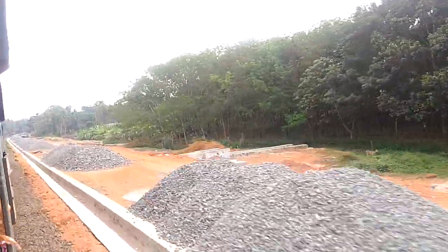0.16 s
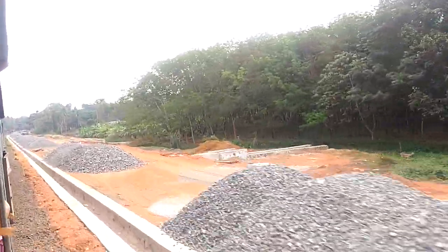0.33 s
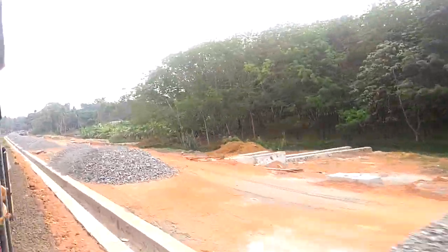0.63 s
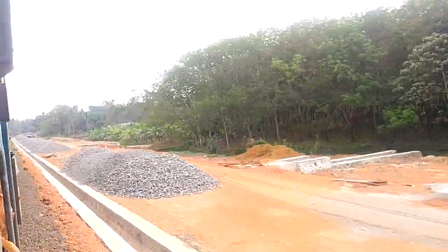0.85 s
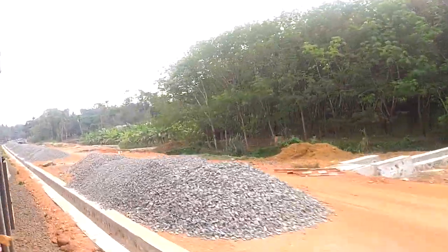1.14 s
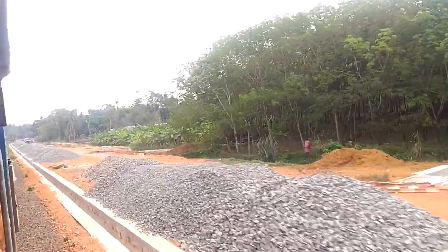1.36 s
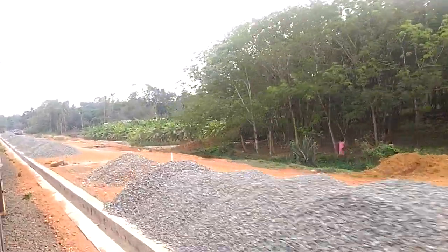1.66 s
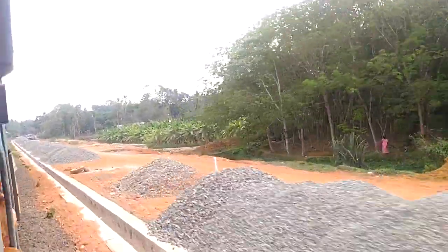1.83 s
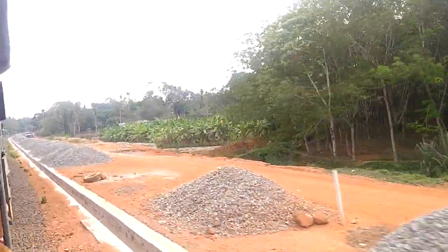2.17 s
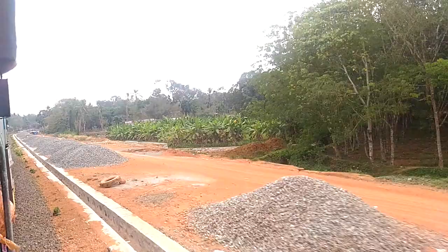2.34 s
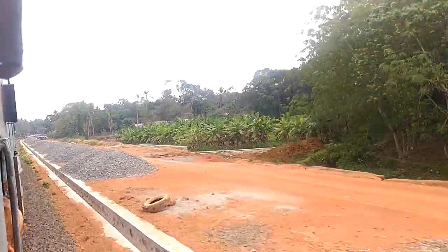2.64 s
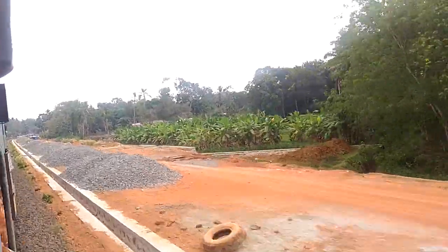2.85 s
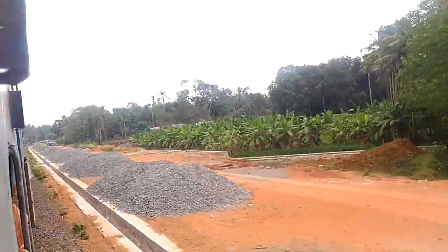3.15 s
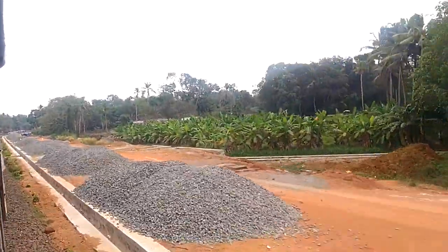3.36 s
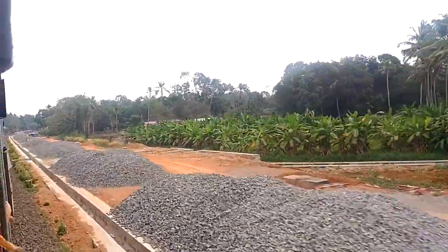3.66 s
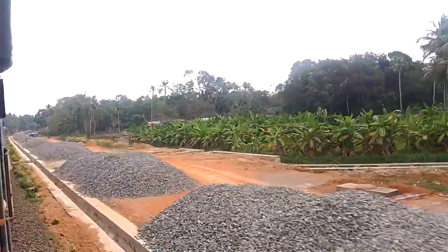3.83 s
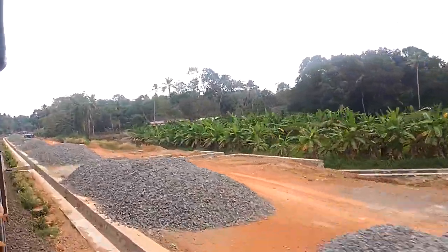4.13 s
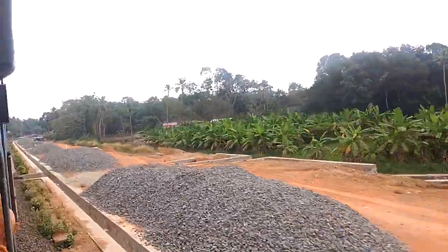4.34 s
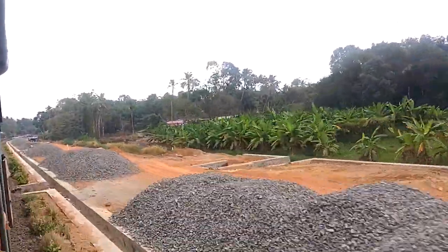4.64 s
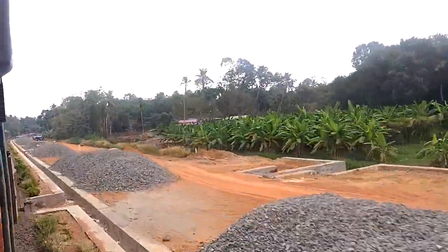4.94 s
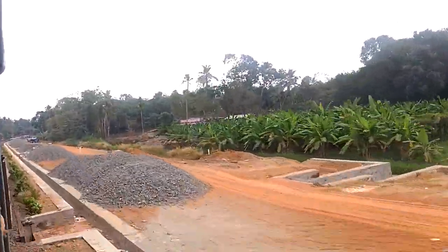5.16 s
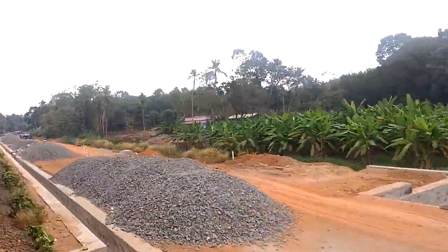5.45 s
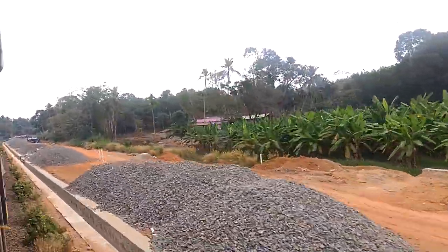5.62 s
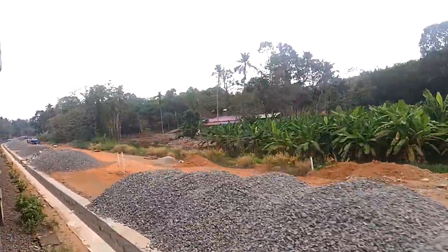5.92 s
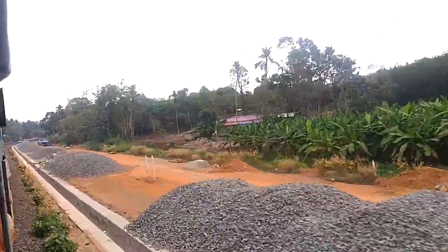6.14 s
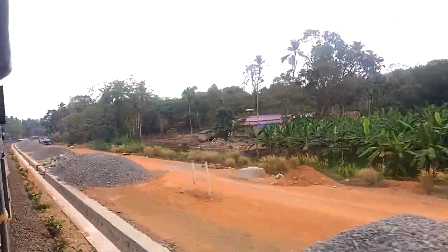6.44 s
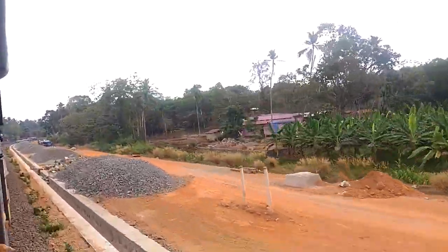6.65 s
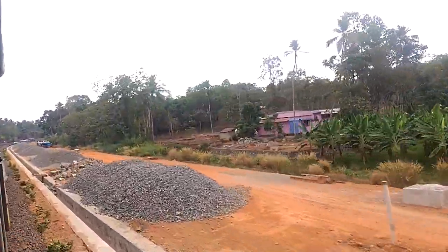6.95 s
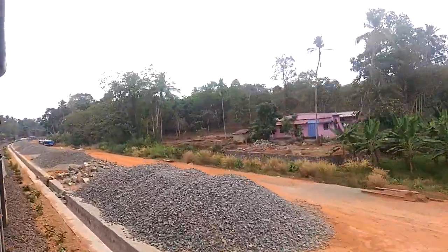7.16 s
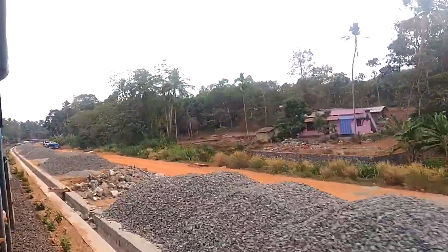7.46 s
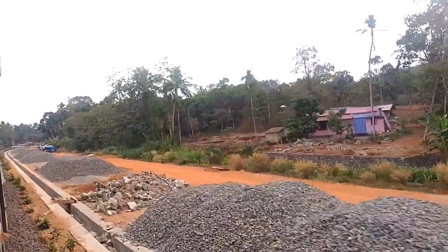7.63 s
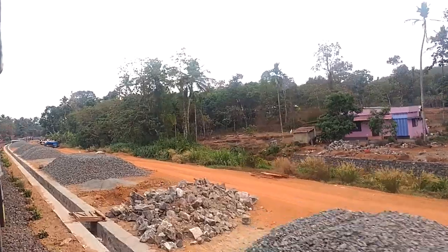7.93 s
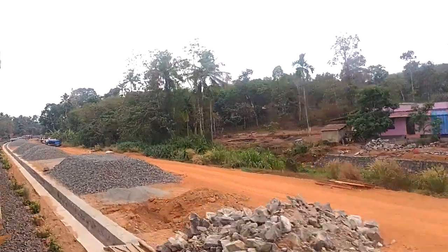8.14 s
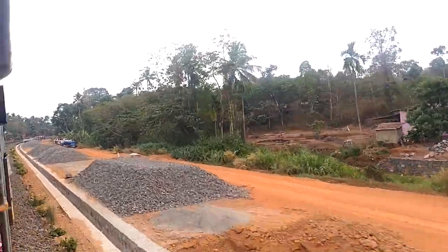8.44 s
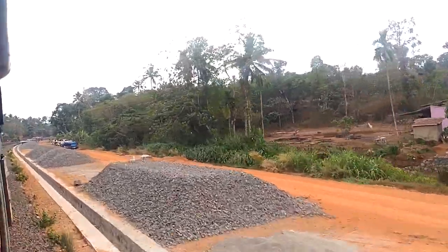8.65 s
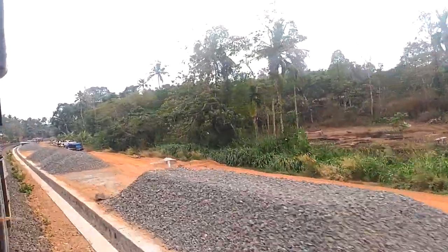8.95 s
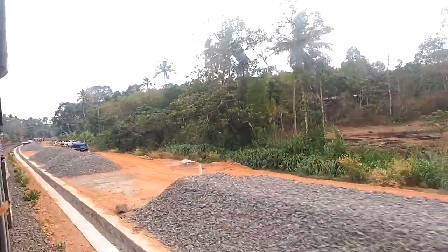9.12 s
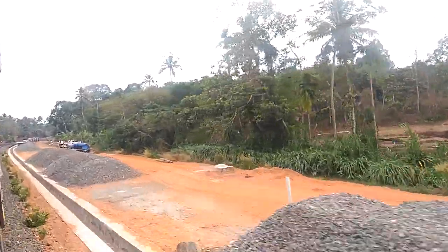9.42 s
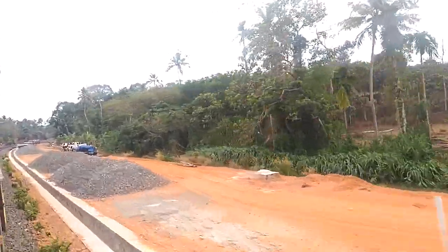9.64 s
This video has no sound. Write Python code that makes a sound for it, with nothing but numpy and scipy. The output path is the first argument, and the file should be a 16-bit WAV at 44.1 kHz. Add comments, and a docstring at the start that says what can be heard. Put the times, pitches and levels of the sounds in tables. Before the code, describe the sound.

Wind buffets a microphone at a moving train's open window, wheels clack over joints, then a distant horn gives one long blast and one short.

```python
"""Train horn from an open coach window

Far ahead the locomotive sounds a single-note air horn, one long blast and a short one, built from
harmonics with echoes that make it flutter. Wheels clack over the rail joints as short bursts of noise, and
axles knock the floor as dying tones. Filtered noise makes the slipstream that buffets the microphone, the
hissing rush of air and rails, and the rolling rumble of the moving coach.
"""
import sys
import numpy as np
from scipy import signal
from scipy.fft import rfft, irfft, next_fast_len
from scipy.io import wavfile
from scipy.ndimage import uniform_filter1d

SR = 44100
rng = np.random.default_rng(int(sys.argv[2]) if len(sys.argv) > 2 else 0)


def unload_wav(signal):
    """Save mono or channel-first audio to the path in sys.argv[1] as 16-bit WAV at rate SR, clipped to [-1, 1]."""
    wavfile.write(
        sys.argv[1],
        SR,
        np.round(np.clip(np.atleast_2d(signal).T, -1, 1) * 32767).astype(np.int16),
    )


N = 431738
T = np.arange(N) / SR  # time in seconds
CUTOFF_HZ = 14330  # top of the sound

# The horn's blasts. Each row: valve opens in seconds, valve closes in seconds,
# pressure release time in seconds, brassiness in dB before each register takes its share.
HORN_BLASTS = [(6.616, 8.186, 0.085, 1), (8.545, 8.907, 0.099, 5)]


def horn():
    """Compressed air sounds the horn each time its valve opens."""
    return sum(blast(*row) for row in HORN_BLASTS)


# Horn pitch, sharp while the air pressure is low. Each row: time in seconds, pitch in Hz before jitter.
HORN_PITCH = [(6.62, 354), (6.66, 344.8), (6.72, 342), (7, 341.2), (7.6, 341.5), (8.12, 341.9), (8.22, 343),
              (8.3, 348.6), (8.38, 352), (8.54, 350.6), (8.6, 343.2), (8.68, 340.4), (8.78, 339.7),
              (8.88, 338.4), (8.97, 342.3), (9.08, 353.5)]
# How the horn's bell favours its harmonics. Each row: frequency in Hz, relative level in dB.
BELL_TONE = [(1026, 4.5), (1368, 6), (1710, 5.5), (2050, 1.5), (2390, -3), (2730, -0.5), (3070, -2),
             (3420, -4.5), (4100, -7.5), (5450, -8), (6400, -15), (7300, -26.5), (8200, -21.5),
             (9400, -31.5), (11000, -28.5), (14000, -31)]
# Borders between the horn's registers (groups of harmonics). Each entry: a frequency in Hz.
REGISTER_BORDERS = [510, 850, 1550, 2200, 3600, 7000]


def blast(opens, closes, release, brass_db):
    """The horn's diaphragm chops air into pulses; low harmonics arrive direct, high ones as fluttering echoes."""
    ring_s = 0.2  # time kept after the valve closes
    scatter_hz = 3300  # here echo and direct sound are equally strong
    doppler, jitter = 0.002, 0.00086  # fractions of the frequency
    kinship = 0.7  # likeness of the echoes of neighbouring harmonics, 0-1
    phase_walk = 0.9  # radians
    live = (T >= opens) & (T < closes + ring_s)
    t = T[live]
    hz, = curves(HORN_PITCH, t)
    wobbly_hz = hz * (1 + jitter * drift(rate_hz=91)[live])
    step = np.exp(2j * np.pi * np.cumsum(wobbly_hz) / SR)
    wave, echoes = 1j, 0
    registers, powers = np.zeros((2, len(REGISTER_BORDERS) + 1, len(t)))
    for harmonic_hz in np.arange(hz.mean(), CUTOFF_HZ, hz.mean()):
        # the bell smears each pulse a little
        wave = wave * step * np.exp(1j * phase_walk * rng.standard_normal())
        # short detours make neighbouring harmonics swell and fade together
        new_echoes = scattered(len(t), doppler * harmonic_hz)
        echoes = kinship * echoes + np.sqrt(1 - kinship ** 2) * new_echoes
        share = harmonic_hz / scatter_hz  # short waves scatter most
        heard = (1 + share * echoes) / np.hypot(1, share)
        partial = amp(read(BELL_TONE, harmonic_hz)) * wave * heard
        register = np.searchsorted(REGISTER_BORDERS, harmonic_hz)
        registers[register] += partial.real
        powers[register] += abs(partial) ** 2 / 2
    pressure = air_pressure(t, opens, closes, release)
    levels = register_levels(live, pressure, brass_db)
    # even out each register before setting its level
    even = registers / np.sqrt(uniform_filter1d(powers, size=1800) + 1e-12)
    tone = (levels * even).sum(0)
    air = escaping_air()[live] * amp(-37.5) * pressure ** 1.1
    sizzle = levels[-1] * amp(-4.5) * coloured(FIZZ_SPECTRUM)[live]
    fade = np.clip(np.minimum(t - t[0], t[-1] - t) / .015, 0, 1)  # 15 ms at each end
    out = np.zeros(N)
    out[live] = fade * (tone + air + sizzle)
    return out


def escaping_air():
    """Escaping air hisses and whistles thinly at the bell: broad noise plus a very narrow band."""
    whistle_hz, width_hz = 3905, 9
    whistle = noise(lambda f: np.exp(-((f - whistle_hz) / width_hz) ** 2))
    hiss = noise(lambda f: amp(read(RUSH_SPECTRUM, f)) * above(f, edge_hz=540))
    return amp(-14.5) * hiss + amp(-27.0) * whistle


def scattered(size, spread_hz, skirt=0.79):
    """Summed echoes of one partial from passing trackside things: a phasor smeared by Doppler shifts."""
    # worked out at every 32nd sample, as it changes slowly
    f = np.fft.fftfreq(next_fast_len(size // 32 + 2), 32 / SR)
    paths = np.exp(2j * np.pi * rng.random(len(f))) / (1 + (f / spread_hz) ** 2) ** skirt
    return np.interp(np.arange(size) / 32, np.arange(len(f)), unit(np.fft.ifft(paths)))


def air_pressure(t, opens, closes, release):
    """Pressure at the horn, 0-1: builds fast as the valve opens and drains ever faster when it closes."""
    attack_s, release_shape = 0.028, 1.6
    build = 1 - np.exp(-((t - opens) / attack_s) ** 2)
    drain = np.exp(-(np.maximum(t - closes, 0) / release) ** release_shape)
    return build * drain


# Guide for the second harmonic, which fades on its own. Each row: time in seconds, guide level in dB.
OCTAVE_FADING = [(6.77, -48), (6.9, -58.5), (7.05, -47), (7.3, -51.5), (7.7, -56.5), (7.85, -48),
                 (8.25, -43.5), (8.62, -41), (8.9, -51)]
# Guides for the other harmonics. Each row: time in seconds, then middle, upper-middle and high
# guide levels in dB.
HARMONIC_FADING = [(6.66, -32.5, -46, -48.5), (6.75, -33, -39, -44), (6.93, -32.5, -34, -39),
                   (7.04, -34, -38, -43), (7.22, -34.5, -39.5, -39), (7.4, -35, -34.5, -43),
                   (7.64, -33, -42.5, -42), (7.76, -49, -49, -46), (7.89, -43.5, -43.5, -41.5),
                   (7.96, -48.5, -47, -33), (8.04, -39.5, -45.5, -44.5), (8.11, -34, -33.5, -43),
                   (8.19, -34, -41, -35.5), (8.27, -21.5, -27.5, -45), (8.6, -29.5, -37, -38),
                   (8.69, -30, -40.5, -39.5), (8.76, -30, -32, -45), (8.9, -32.5, -37.5, -35)]
# Horn registers, from fundamental to sizzle. Each row: offset in dB, share of its fading (a factor),
# share of brassiness (a factor), power of air pressure (an exponent), waver in dB.
HORN_REGISTERS = [(-2, .33, 0.069, 0.62, 1.73), (-1, 1.3, 0.057, 0.71, 1.5), (-2.63, 1.01, 0, 1.84, .5),
                  (-4.1, 1.04, 0.14, 2, 1.3), (-0.05, 1.02, 0.03, 2.4, 1.4), (0, 0.97, 0, 3.14, 1.2),
                  (-18, .15, 0.66, 3.6, 1.3)]


def register_levels(live, pressure, brass_db):
    """Gain of each register: the high ones need full air pressure, so they speak last and stop first."""
    held_db = -38.5  # the guides count as swells and dips around this level
    t = T[live]
    guides = np.array(curves(OCTAVE_FADING, t) + curves(HARMONIC_FADING, t))
    octave, middle, upper, high = guides - held_db
    fadings = middle, octave, middle, middle, upper, high, high
    levels = []
    for row, fading_db in zip(HORN_REGISTERS, fadings):
        offset_db, share, brass, power, waver_db = row
        waver = waver_db * drift(rate_hz=11.6)[live]
        level_db = held_db + offset_db + share * fading_db + brass * brass_db + waver
        levels.append(amp(level_db) * pressure ** power)
    return np.array(levels)


# Wheels on rail joints. Each row: time in seconds, strength in dB before trims.
WHEEL_CLACKS = [(0.185, -43.5), (0.359, -54), (1.2595, -50.5), (1.6824, -45), (1.9365, -44.5), (2.08, -40),
                (2.31, -34.5), (2.449, -40), (2.9335, -43.5), (3.336, -52.5), (3.562, -47), (3.6744, -54),
                (3.769, -60), (3.8257, -49.5), (3.9629, -48), (4.189, -44), (4.328, -55), (4.44, -49.5),
                (4.58, -47.5), (4.809, -44.5), (4.9492, -46.5), (5.4435, -48.5), (5.8187, -41),
                (9.1164, -54), (9.4924, -66)]
# Dull axle knocks through the floor. Each row: time in seconds, strength in dB before each tone's offset.
AXLE_KNOCKS = [(6.241, -44.5), (6.388, -39), (6.539, -41)]
# Ringing tones of the floor. Each row: frequency in Hz, offset in dB, time to die by 60 dB in seconds.
FLOOR_TONES = [(193, 0, 0.11), (232, 15.5, 0.043), (323, -9, 0.04)]


def clatter():
    """Each joint gives a rattling splash, brighter when it is hit harder; some axles knock on the floor."""
    splash, treble, knocks = np.zeros((3, N))
    for s, db in WHEEL_CLACKS:
        splash += amp(db - 3.5) * burst(s - .003, rise=0.0029, t60=0.22)
        treble += amp(-69 + 1.3 * (db + 49)) * burst(s - .003, rise=0.0048, t60=0.16)
    for s, db in AXLE_KNOCKS:
        for hz, tone_db, t60 in FLOOR_TONES:
            tone = np.sin(2 * np.pi * hz * (T - s))
            knocks += amp(db + tone_db) * burst(s, rise=0.0057, t60=t60) * tone
    steel = noise(lambda f: amp(read(RUSH_SPECTRUM, f)) * above(f, edge_hz=1390))
    steel = patchy(steel, depth_db=1.5, frames=25, bins=4)
    return splash * steel + treble * coloured(FIZZ_SPECTRUM) + knocks


def burst(s, rise, t60):
    """Envelope of a blow at time s: a quick rise, then a steady fall in dB."""
    age = np.maximum(T - s, 0)
    live = (age > 0) & (age < .5)
    out = np.zeros(N)
    out[live] = (1 - np.exp(-age[live] / rise)) * amp(-60 * age[live] / t60)
    return out


# Slipstream between the gusts. Each row: time in seconds, buffeting in dB before trims.
WIND_LEVEL = [(0.0, -31), (0.3, -38.5), (0.65, -27), (1.35, -39.5), (1.85, -40.5), (2.3, -34), (3.0, -34.5),
              (3.5, -40), (4.3, -40.5), (4.85, -40.5), (5.7, -33), (6.1, -39.5), (6.23, -46.5),
              (6.5, -51.5), (6.8, -39), (7.08, -47.5), (7.3, -35), (8.5, -39.0), (9.79, -36.0)]
# Spectrum of the slipstream. Each row: frequency in Hz, relative level in dB per Hz.
WIND_SPECTRUM = [(15, -2.5), (45, 3.5), (115, 0), (170, -4), (240, -9), (310, -11.5), (360, -14.5),
                 (425, -13.5), (490, -19), (620, -22.5), (790, -30.5), (1200, -42)]
# Gusts that strike the microphone. Each row: start in seconds, length in seconds,
# buffeting in dB and flutter in dB, both before trims.
WIND_GUSTS = [(0.444, .15, -22.5, -26.5), (0.764, 0.54, -27.5, -32.5), (1.37, .4, -26, -32.5),
              (1.908, 0.2, -26.5, -31), (2.53, 0.11, -49, -34.5), (3.195, .12, -28, -34.5),
              (3.7, 0.18, -35, -38), (4.456, 0.23, -31.5, -36.5), (4.94, 0.37, -32, -34),
              (5.326, 0.099, -25, -32), (5.542, 0.2, -39, -31.5), (5.846, 0.23, -31, -25.5),
              (6.545, 0.21, -33.5, -45), (7.135, .13, -25.5, -31.5), (7.245, 0.33, -30.5, -52),
              (7.979, 0.32, -28, -35), (8.703, 0.075, -34, -35.5), (8.997, 0.23, -30, -41.5),
              (9.455, 0.2, -28, -37)]


def slipstream():
    """Eddies from large to small hit the microphone; the smallest grow with both gusts and the rush of air."""
    wind_db, = curves(WIND_LEVEL, T)
    rush_db, = curves(RUSH_LEVEL, T)
    large, small = amp(wind_db), amp(wind_db - 3.5)
    for start, length, large_db, small_db in WIND_GUSTS:
        push = gust(start, length)
        large = np.hypot(large, amp(large_db) * push)
        small = np.hypot(small, amp(small_db) * push)
    excess_db = 20 * np.log10(small) + 37
    roar_db = -48.5 + 0.24 * excess_db + 0.48 * (rush_db + 60.5)
    puffs_db = -58.5 + 0.7 * excess_db + 0.044 * (rush_db + 67) + 2.35 * drift(rate_hz=6.4)
    swirl_db = 2.34 * drift(rate_hz=20.2)
    buffet = amp(-1.3) * large * eddies(low_hz=7.7, high_hz=119.7, size=3000)
    flutter = amp(-2.4) * small * eddies(low_hz=117.7, high_hz=318, size=2400)
    roar_eddies = eddies(low_hz=313, high_hz=532, size=1800)
    roar = amp(roar_db) * patchy(roar_eddies, depth_db=4.0, frames=12, bins=2)
    puff_eddies = eddies(low_hz=685, high_hz=1610, size=2000)
    puffs = amp(puffs_db) * patchy(puff_eddies, depth_db=2.5, frames=10, bins=3)
    return (buffet + flutter + roar + puffs) * amp(swirl_db)


def gust(start, length):
    """A gust rises fast, holds and drops away."""
    edge_s = 0.055  # rise and fall time
    return np.clip(np.minimum(T - start, start + length - T) / edge_s + .5, 0, 1)


def eddies(low_hz, high_hz, size):
    """Eddies of one size range: a band of wind noise with its long swells evened out."""
    band = noise(lambda f: amp(read(WIND_SPECTRUM, f)) * above(f, low_hz) * below(f, high_hz))
    return steadied(band, size)


# Rush of air and rails. Each row: time in seconds, level in dB before trims and flicker.
RUSH_LEVEL = [(0, -58.5), (.52, -42.5), (.88, -43.5), (1.3, -59), (1.86, -59.5), (2.0, -55.5), (2.27, -58),
              (2.56, -49), (3.1, -59.5), (3.48, -71), (3.7, -62), (4.12, -65), (4.6, -61), (4.78, -67.5),
              (4.98, -55), (5.35, -60.5), (6.03, -42), (6.17, -55), (6.25, -78), (8.4, -77), (9.1, -65.5),
              (9.33, -76), (9.55, -58.5), (9.79, -69.5)]
# Spectrum of the rush. Each row: frequency in Hz, relative level in dB per Hz.
RUSH_SPECTRUM = [(300, -3), (700, -3), (1000, 0.5), (1400, -1.5), (1750, 3), (2200, 7), (3000, -0.5),
                 (4200, -2.5), (5500, -7), (6800, -22.5), (9000, -30), (14000, -75)]
# Spectrum of the finest hiss. Each row: frequency in Hz, relative level in dB per Hz.
FIZZ_SPECTRUM = [(3000, -7), (6000, -4), (9000, -4.5), (11000, -12), (14000, -18)]


def rush():
    """Hiss of air and rails in shifting patches; the fine fizz on top swells less than the body."""
    level_db, = curves(RUSH_LEVEL, T)
    flicker_db = 2.65 * drift(rate_hz=20.5)
    body_db = level_db - 2.77 + flicker_db
    fizz_db = -72.0 + 0.45 * (level_db + 57) + 0.99 * flicker_db
    body = amp(body_db) * patchy(coloured(RUSH_SPECTRUM), depth_db=2.0, frames=13, bins=5)
    fizz = amp(fizz_db) * patchy(coloured(FIZZ_SPECTRUM), depth_db=1.0, frames=20, bins=12)
    return body + fizz


# Spectrum of the rolling coach. Each row: frequency in Hz, relative level in dB per Hz.
ROLL_SPECTRUM = [(15, -50), (25, 19), (187, -22), (231, 2), (271, -19), (326, -35), (363, -18), (1260, -51),
                 (1400, -19), (1510, -21), (14000, -50)]


def rolling():
    """Even rumble of the coach, with a faint wheel tone made of narrow-band noise."""
    wheel_hz, width_hz = 1389, 14
    sing = noise(lambda f: 1 / (1 + ((f - wheel_hz) / width_hz) ** 2))
    return amp(-55) * coloured(ROLL_SPECTRUM) + amp(-84) * sing


def amp(db):
    """Turns dB into a plain gain."""
    return 10 ** (np.asarray(db) / 20)


def unit(x):
    """Scales to rms 1."""
    return x / np.sqrt(np.mean(abs(x) ** 2) + 1e-20)


def read(points, hz):
    """Reads a spectrum in dB along a log-frequency axis."""
    f, db = np.transpose(points)
    return np.interp(np.log(hz + 1), np.log(f), db)


def curves(rows, t):
    """Each column of a table at the times t."""
    s, *columns = np.transpose(rows)
    return [np.interp(t, s, c) for c in columns]


def noise(gain):
    """Noise of rms 1 with the spectrum gain(Hz)."""
    size = next_fast_len(N)
    spectrum = rfft(rng.standard_normal(size)) * gain(np.fft.rfftfreq(size, 1 / SR))
    return unit(irfft(spectrum, size)[:N])


def coloured(points):
    """Noise with a tabled spectrum."""
    return noise(lambda f: amp(read(points, f)))


def drift(rate_hz):
    """Slow random wander of rms 1, worked out at every 32nd sample."""
    f = np.fft.rfftfreq(N // 32, 32 / SR)
    slow = irfft(rfft(rng.standard_normal(N // 32)) * np.exp(-(f / rate_hz) ** 2))
    return np.interp(np.arange(N) / 32, np.arange(len(slow)), unit(slow))


def steadied(x, size):
    """Evens out the swells longer than size samples."""
    power = uniform_filter1d(uniform_filter1d(x ** 2, size), size)
    return x / np.sqrt(power + 1e-9)


def below(f, edge_hz):
    """Steep low-pass gain."""
    return 1 / np.sqrt(1 + (f / edge_hz) ** 10)


def above(f, edge_hz):
    """Steep high-pass gain."""
    return np.sqrt(1 - below(f, edge_hz) ** 2)


def patchy(x, depth_db, frames, bins):
    """Lets patches of the spectrum, some frames long and some bins wide, swell and sink on their own."""
    z = signal.stft(x, nperseg=512, noverlap=384)[2]
    field = rng.standard_normal(z.shape)
    for _ in range(2):
        field = uniform_filter1d(field, bins, axis=0)
        field = uniform_filter1d(field, frames, axis=1)
    swelling = z * amp(depth_db * unit(field))
    return unit(signal.istft(swelling, nperseg=512, noverlap=384)[1][:N])


def scene():
    """The horn ahead, wheels, wind and running noise meet at one microphone."""
    return (horn() + clatter() + slipstream() + rush() + rolling())[None]


def record(dry):
    """Takes away everything above the cutoff with a steep low-pass filter."""
    lowpass = signal.firwin(801, CUTOFF_HZ, window=("kaiser", 9), fs=SR)
    return signal.oaconvolve(dry, lowpass[None], "same")


dry = scene()
out = record(dry)
unload_wav(out)
```